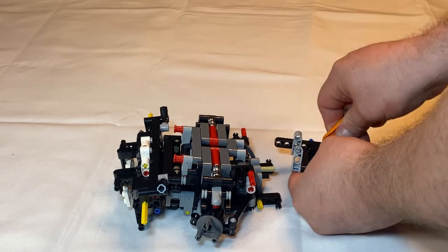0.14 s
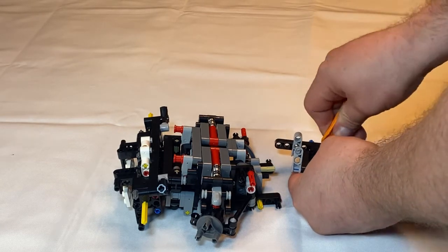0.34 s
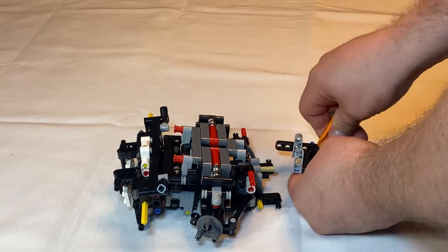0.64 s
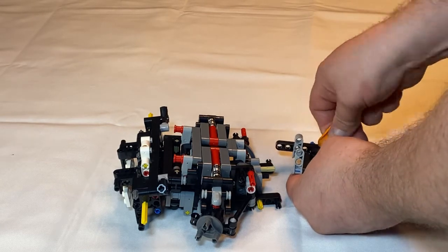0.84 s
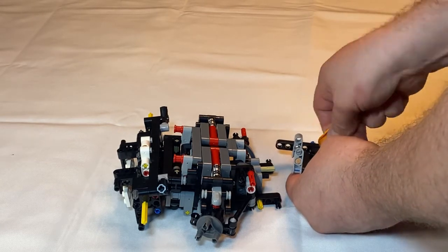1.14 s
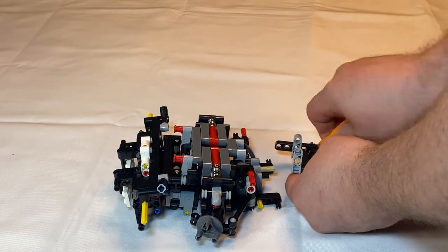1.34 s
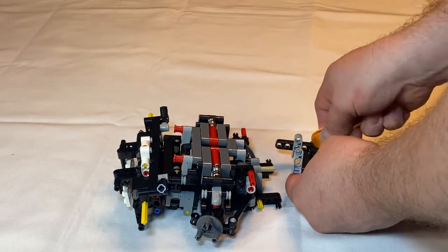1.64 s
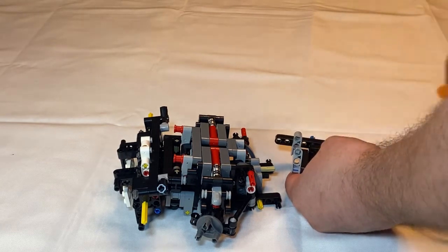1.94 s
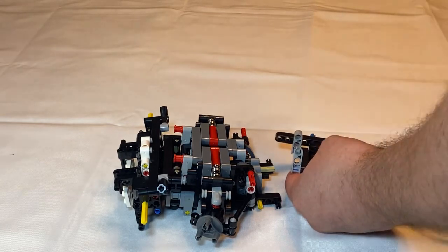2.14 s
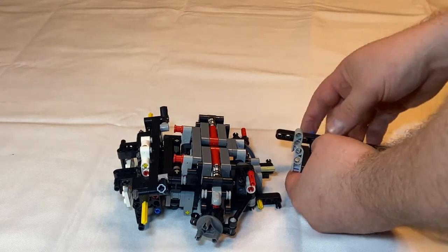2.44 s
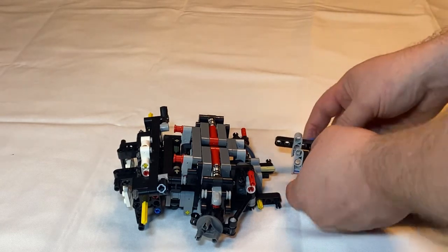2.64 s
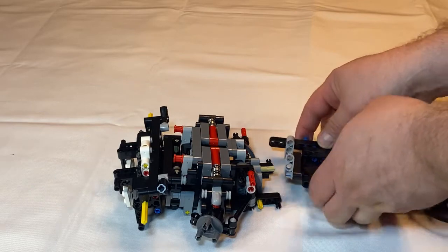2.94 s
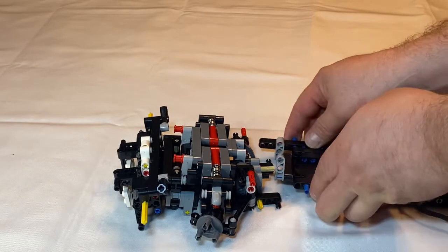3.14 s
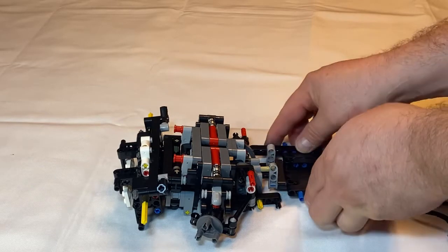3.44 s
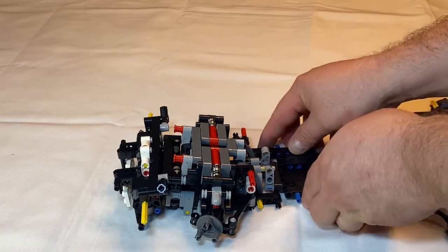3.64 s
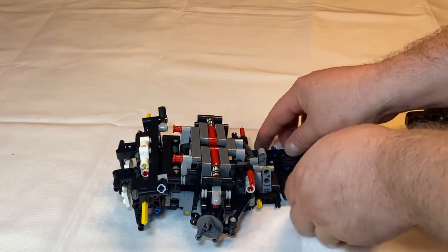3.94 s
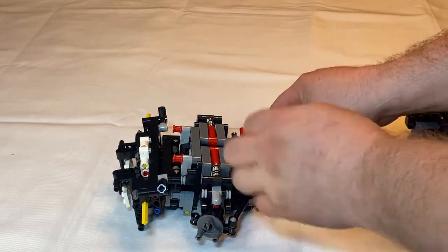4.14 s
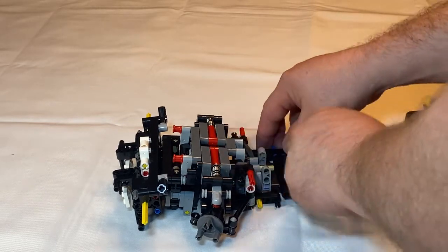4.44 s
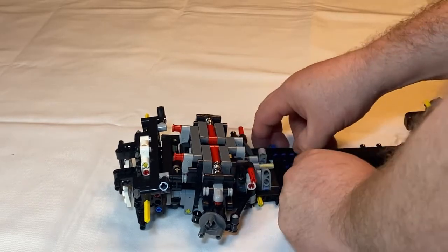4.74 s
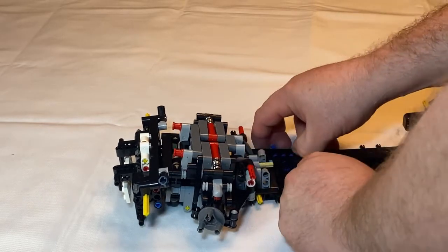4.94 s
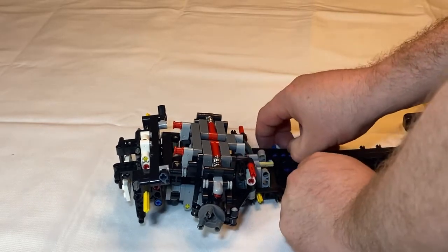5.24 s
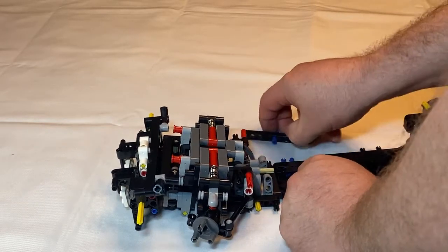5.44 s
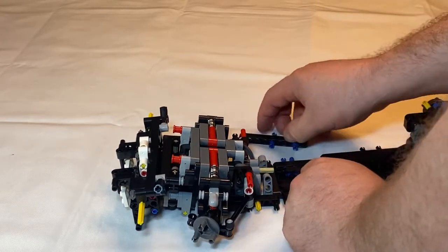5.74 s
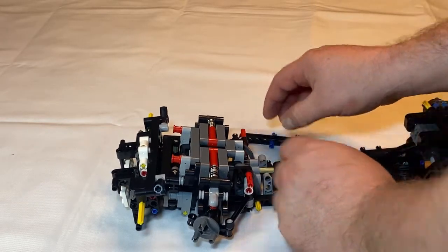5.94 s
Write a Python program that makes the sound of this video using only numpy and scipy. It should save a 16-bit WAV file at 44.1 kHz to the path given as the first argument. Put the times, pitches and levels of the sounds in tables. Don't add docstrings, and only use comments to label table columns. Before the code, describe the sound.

Small hard plastic parts click and scrape softly in a quiet room, a tool knocks on wood, then a joint snaps twice, very loudly.

```python
import sys
import numpy as np
from scipy import signal
from scipy.fft import rfft, irfft, next_fast_len
from scipy.io import wavfile
from scipy.ndimage import uniform_filter1d

SR = 44100
rng = np.random.default_rng(int(sys.argv[2]) if len(sys.argv) > 2 else 0)


def convert_level_to_amplitude(level_db):
    exponent = np.asarray(level_db, float) / 20
    return 10 ** exponent


def master(y):
    cut = np.clip(np.atleast_2d(y).T, -1, 1)
    pcm = np.round(cut * 32767)
    wavfile.write(sys.argv[1], SR, pcm.astype(np.int16))


N = 268569

# f/Hz, width/Hz, level/dB
EDGE = [(5494, 2200, 12.5), (6330, 1200, -0.5), (10790, 1300, -11.5), (13200, 2400, 8)]


def tick(row, noise, body_modes, share, rise_s, ring_s, hard):
    s, db, hz, edge_db, fizz_db, body_db = row
    t = np.arange(len(noise)) / SR
    strike = hard * signal.unit_impulse(len(t), idx=40)
    contact = noise * (1 - np.exp(-(t / rise_s) ** 2)) * np.exp(-t / ring_s) + strike
    cavity = resonate(resonate(contact, [(hz, 800, 0)]), [(hz, 800, 0)])
    ring = cavity + share * resonate(contact, body_modes)
    edge = resonate(resonate(contact, EDGE[:2]), [(6950, 1900, 0)])
    fizz = resonate(resonate(contact, EDGE[2:]), [(12000, 11000, 0)])
    body = resonate(resonate(contact, [(1113, 1300, 0)]), [(1113, 1300, 0)])
    sound = peaked(ring) + convert_level_to_amplitude(edge_db + 6.5) * peaked(edge)
    sound += convert_level_to_amplitude(fizz_db + 15.0) * peaked(fizz)
    sound += convert_level_to_amplitude(body_db + 3.5) * peaked(body)
    return convert_level_to_amplitude(db) * sound


FIZZ_FOLLOWS = 0.68


def ticks(rows, kind, *shape):
    fizz_db, body_db = kind
    out, noise = np.zeros(N), rng.standard_normal((len(rows), 700))
    for row, chatter in zip(rows, noise):
        full_row = (*row, fizz_db + FIZZ_FOLLOWS * row[-1], body_db)
        add(out, row[0] - .0005, tick(full_row, chatter, *shape))
    return out


# fine fizz level/dB, body weight level/dB
KINDS = [
    (-14.5, -41),
    (-10.5, -9),
    (-14, -24.5),
    (-15, -4),
    (-8.5, -22.5),
]
# f/Hz, width/Hz, level/dB
PART = [(1070, 560, -12.5), (1949, 560, -6), (2750, 356, 2), (3550, 700, -6.5), (4600, 400, -12.5)]
# t/s, peak level/dB, ring f/Hz, edge brightness/dB
PRYING = [(0.0145, -38.5, 2930, -9.5), (0.0471, -40.5, 2700, -13), (0.0556, -41, 2480, -5.5),
          (0.0688, -36.5, 3560, -12.5), (0.1965, -38.5, 3600, -13.5), (0.4373, -62, 2890, 3.5),
          (0.4776, -58, 2850, 8), (0.4933, -42.5, 3080, -13), (0.516, -41.5, 3410, -11),
          (0.5347, -51, 3350, -8), (0.549, -47.5, 3520, -23), (0.606, -31.5, 2120, -16),
          (0.6188, -45.5, 1880, -0.5), (0.8695, -61, 2790, -3), (0.8862, -38, 2650, -6),
          (1.0466, -42, 2170, -11), (1.068, -42.5, 2830, -3.5), (1.0854, -38.5, 2880, -14),
          (1.096, -47.5, 2620, -5), (1.1123, -45, 2760, -15), (1.128, -40.5, 2850, -2),
          (1.135, -43.5, 2830, -19), (1.14, -38.5, 3480, -20), (1.158, -39.5, 2880, -13),
          (1.462, -45, 2750, -5.5), (1.4732, -40.5, 2420, -14), (1.4837, -39.5, 3270, -14),
          (1.5008, -41.5, 2850, -12), (1.624, -48, 2440, -7), (1.7638, -60, 2900, -2.5)]
RESTING = [(0.205, -39, 2850, -14), (0.2143, -42.5, 3320, -7), (0.223, -38.5, 2400, -14),
           (0.266, -40, 2550, -13), (0.3162, -52, 1880, -5), (0.61, -37, 2150, -8),
           (0.8412, -48.5, 2620, -9.5), (1.0404, -40, 2350, -22), (1.0537, -52.5, 2180, 0.5),
           (1.1709, -43, 2310, -8.5), (1.6045, -46.5, 3680, -13), (1.6188, -42, 2940, -12.5),
           (1.7376, -55, 2660, -11), (2.6174, -52, 1720, -10), (2.6901, -44.5, 2620, -4.5),
           (2.828, -45.5, 3300, -7), (2.8645, -38.5, 2410, -21), (2.908, -38.5, 2500, -27),
           (2.939, -41, 2850, -9), (3.864, -46.5, 2920, 0.5), (4.279, -53, 3600, -16)]
FITTING = [(0.4647, -68, 2190, 3), (0.57, -66, 3680, 4), (1.033, -30.5, 2020, -22), (2.232, -59, 6000, -12),
           (2.306, -55, 6100, -5), (2.6278, -44.5, 2660, -8), (2.92, -39.5, 3600, -21),
           (3.122, -43.5, 2840, -10), (3.7728, -41, 2900, -8.5), (3.7837, -45, 2890, -12),
           (3.8509, -37.5, 2700, -32), (3.932, -45.5, 2660, -32), (4.5474, -43, 2670, -12),
           (4.55, -44, 2800, -28), (4.587, -35, 2660, -45), (4.5904, -38, 2680, -48),
           (4.6413, -30.5, 3140, -15), (4.816, -28.5, 2920, -12), (4.817, -34.5, 4600, -11),
           (4.858, -59, 4500, -6), (4.907, -50, 3000, -14), (4.831, -44, 4550, -13),
           (5.7972, -45.5, 2730, -30), (5.8578, -51, 3030, -10.5)]
FORCING = [(4.0942, -44, 2600, -17.5), (4.6331, -38.5, 2760, -3.5), (4.8246, -44.5, 2970, -17.5),
           (4.937, -54, 2620, -11), (4.964, -42, 2620, -9.5), (4.9917, -38.5, 2720, -11.5),
           (5.022, -40, 2650, -18), (5.138, -40, 2470, -12), (5.1903, -38, 3100, -12.5),
           (5.216, -43.5, 3190, -11), (5.238, -40, 2816, -12.5), (5.2652, -37, 3156, -7)]


def handling():
    small = zip((PRYING, RESTING, FITTING, FORCING), KINDS)
    return sum(ticks(rows, kind, PART, 0.32, .0005, 0.0014, 1.6) for rows, kind in small)


# t/s, peak level/dB, ring f/Hz, edge brightness/dB
SNAPS = [
    (5.3468, -9.5, 2900, 0),
    (5.3495, -10, 3050, -12),
    (5.3692, -4, 2530, -11),
    (5.3694, -13.5, 2920, -8.5),
    (5.3772, -11.5, 3332, -12),
    (5.3848, -12.5, 2750, -18.5),
    (5.4024, -22.5, 3590, -10.5),
    (5.4295, -20, 3100, -19.5),
]
# f/Hz, width/Hz, level/dB
JOINT = [(870, 240, -7.5), (1550, 290, -3.5), (1980, 540, -6), (2850, 417, 2), (3600, 460, 0),
         (4317, 350, -1.5), (6950, 1100, -12)]


def snapping():
    return ticks(SNAPS, KINDS[-1], JOINT, 1.1, 0.00078, 0.0013, 1.5)


# t/s, level/dB, t60/s
RATTLE = (5.349, -23.5, 0.29)
# f/Hz, width/Hz, level/dB
SCRAPE = [(5130, 2900, 0.5), (7340, 4300, -8.5), (11100, 1800, -7), (12540, 2600, 2)]


def rattle():
    s, db, t60 = RATTLE
    out, u = np.zeros(N), np.arange(SR // 3) / SR
    clumps = convert_level_to_amplitude(2.8 * evened(uniform_filter1d(rng.standard_normal(len(u)), size=150)))
    shower = clumps * rng.standard_normal(len(u)) * (rng.random(len(u)) < .15)
    ring = resonate(shower, JOINT) + .45 * resonate(shower, SCRAPE)
    add(out, s, convert_level_to_amplitude(db - 60 * u / t60) * evened(ring))
    return out


# strongest t/s, rise/s, fall/s, effort level/dB, brightness/dB
DRAGS = [(.56, .16, 0.087, -67, -14), (.622, .01, 0.091, -59, -7.5), (.892, .05, 0.034, -57, -13),
         (1.033, 0.0045, .22, -49, -18), (1.482, 0.049, 0.059, -48, -8), (1.614, 0.018, 0.043, -55.5, -1),
         (1.76, .07, .04, -75, -2), (1.944, 0.051, 0.029, -89, 20.5), (2.48, 0.021, 0.032, -71, 4),
         (2.66, 0.093, 0.35, -57.5, -5.5), (2.915, .22, 0.17, -46, -10.5), (3.125, 0.2, 0.16, -61, -3),
         (3.2, .12, 0.094, -60, -11), (3.425, 0.034, 0.044, -57, -2.5), (3.54, 0.36, 0.15, -68.5, -13),
         (3.84, 0.37, 0.13, -57, -18.5), (4.096, 0.013, 0.11, -55, -19), (4.278, 0.018, 0.047, -59, -10),
         (4.63, 0.13, .07, -58, -13), (4.817, 0.01, 0.087, -50.5, -5.5), (4.996, .07, .1, -66, -2),
         (5.22, 0.13, 0.23, -58, -11.5), (5.797, 0.0069, 0.17, -66.5, -10)]
# loss over one rise or fall/dB, curve power
DRAG_FADE = (-32.5, 1.62)


def strokes():
    clumps = convert_level_to_amplitude(3.9 * evened(uniform_filter1d(rng.standard_normal(N), size=400)))
    sizes = convert_level_to_amplitude(6.7 * np.minimum(rng.exponential(1, N), 2.6))
    slips = rng.random(N) < 1500. / SR
    grains = sizes * slips * rng.choice([-1, 1], N)
    drive = evened(grains * clumps) + 0.72 * rng.standard_normal(N)
    hollow = evened(resonate(drive, PART))
    thin = evened(resonate(resonate(drive, SCRAPE), [(8870, 21000, 0.0076)]))
    effort, bright = swells(DRAGS, DRAG_FADE)
    return convert_level_to_amplitude(-6.0) * (effort * hollow + bright * convert_level_to_amplitude(5.5) * thin)


# t/s, peak level/dB
KNOCKS = [
    (2.1, -63),
    (2.125, -58),
    (2.178, -49),
    (2.216, -46),
    (2.229, -24.5),
    (2.238, -29.5),
    (2.243, -29),
    (2.27, -53),
    (2.31, -33.5),
]
# f/Hz, width/Hz, level/dB
WOOD = [(165, 61, 3.5), (347, 100, 2), (537, 186, 9.5), (705, 73, -7), (840, 62, 3.5), (1560, 450, -2),
        (1840, 250, -1.5), (2600, 290, -6.5), (2890, 270, -7.5)]


def knocks():
    out, u = np.zeros(N), np.arange(SR // 10) / SR
    chatter = rng.standard_normal((len(KNOCKS), len(u)))
    dull = signal.butter(6, 3200, fs=SR, output="sos")
    for (s, db), noise in zip(KNOCKS, chatter):
        ring = signal.sosfilt(dull, resonate(noise * np.exp(-u / 0.0045), WOOD))
        add(out, s, convert_level_to_amplitude(db) * peaked(ring))
    return out


# strongest t/s, rise/s, fall/s, deep sway level/dB, rumble against sway/dB
LEANS = [(0.01, 0.088, 0.32, -57.5, 2.5), (.23, 0.29, 0.26, -50, -2), (.63, 0.063, 0.061, -47, -2),
         (.69, 0.14, 0.24, -45.5, -16), (.86, 0.056, 0.19, -51.5, -1.5), (1.16, 0.32, 0.21, -57.5, 1.5),
         (1.64, 0.15, 0.14, -52, 0), (1.91, 0.087, 0.19, -64, -20), (2.134, .1, 0.21, -53, -2),
         (2.234, 0.052, 0.27, -56, 16), (2.4, 0.26, 0.11, -51.5, -4), (2.68, 0.11, 0.73, -75, 10.5),
         (2.89, 0.065, 0.12, -49.5, 0.5), (2.96, .1, 0.38, -48, -22), (3.93, 0.65, .3, -55, -11),
         (4.2, 0.62, 0.56, -66, 2), (4.66, 0.13, 0.11, -54, 6), (4.83, 0.035, 0.11, -52.5, 6),
         (4.88, 0.09, .12, -45.5, -8), (4.98, 0.075, 0.28, -54.5, 1.5), (5.22, 0.2, 0.42, -50, -1.5),
         (5.375, .025, 0.21, -35.5, 7.5), (5.45, .1, .4, -43, -19), (6.07, 0.58, 0.21, -65, 3)]
# loss over one rise or fall/dB, curve power
LEAN_FADE = (-30.5, 1.166)
# f/Hz, width/Hz, level/dB
DEEP = [(46.3, 31, -4), (77.5, 30, 1.5)]
# f/Hz, width/Hz, level/dB
PANEL = [(165, 60, -1.5), (250, 145, -1), (343, 125, 0), (630, 600, -13.5)]
# t/s, peak level/dB, f/Hz, t60/s
THUDS = [(.612, -37.5, 165, 0.34), (0.843, -45, 88, 0.16), (1.167, -46.5, 124.4, 0.18),
         (1.614, -42, 100, 0.16), (2.874, -44, 165, 0.31), (2.944, -40.5, 77.3, 0.35),
         (4.637, -47.5, 91.4, 0.44), (4.823, -42.5, 128, 0.16), (5.348, -16, 296, 0.075),
         (5.369, -30, 204.6, 0.33), (5.371, -28.5, 97.1, 0.38), (5.35, -28.5, 148, 0.49)]


def table():
    sway, rumble = swells(LEANS, LEAN_FADE)
    deep = evened(resonate(resonate(rng.standard_normal(N), DEEP), [(69.86, 220, 0)]))
    panel = evened(resonate(resonate(rng.standard_normal(N), PANEL), [(264.0, 630, 0)]))
    out = convert_level_to_amplitude(-1.5) * sway * deep + convert_level_to_amplitude(-2.5) * rumble * panel
    u = np.arange(SR // 2) / SR
    soft_start = 1 - np.exp(-u / 0.0026)
    for start, db, hz, t60 in THUDS:
        overtone = .45 * np.sin(2 * np.pi * 1.62 * hz * u) * np.exp(-u / 0.015)
        ring = np.sin(2 * np.pi * hz * u) + overtone
        add(out, start, convert_level_to_amplitude(db - 60 * u / t60) * soft_start * ring)
    return out


# f/Hz, t60/s
ROOM = [(100, 0.42), (500, 0.3), (2000, 0.39), (6000, 0.34), (12000, 0.21)]


def room(x, gap_s, length):
    taps = np.zeros(SR // 2)
    at = np.arange(100, SR // 2 - 12, 12)
    taps[at + rng.integers(0, 12, len(at))] = rng.choice([-1., 1.], len(at))
    hz, t, z = signal.stft(taps, SR, nperseg=256)
    t60 = length * read(ROOM, hz)[:, None]
    tail = signal.istft(z * convert_level_to_amplitude(-60 * t / t60), SR, nperseg=256)[1]
    tail *= 1 - np.exp(-(np.arange(len(tail)) / SR / gap_s) ** 2)
    return signal.fftconvolve(x, tail / np.linalg.norm(tail))[:N]


# f/Hz, density level/dB
ROOM_TONE = [(18, -27), (32, 0.5), (77, 2), (240, -9), (1300, -23.5), (2200, -25), (2630, -23), (3800, -28),
             (7000, -32.5), (12500, -30.5), (16000, -45.5)]
ROOM_TONE_DB = -64.5


def room_tone():
    return convert_level_to_amplitude(ROOM_TONE_DB) * evened(coloured(rng.standard_normal(N), ROOM_TONE))


def swells(rows, fade):
    top, rise, fall, db, second_db = np.transpose(rows)[:, :, None]
    t = np.arange(0, N + 64, 64) / SR
    before = (top - t) / np.maximum(rise, .002)
    after = (t - top) / np.maximum(fall, .002)
    away = np.where(t < top, before, after)
    gain = convert_level_to_amplitude(db + fade[0] * away ** fade[1])
    layers = (gain, gain * convert_level_to_amplitude(second_db))
    return [np.interp(np.arange(N) / SR, t, np.linalg.norm(g, axis=0)) for g in layers]


def resonate(x, modes):
    out = 0
    for k, (hz, width, db) in enumerate(modes):
        out = out + (-1) ** k * convert_level_to_amplitude(db) * signal.lfilter(*signal.iirpeak(hz, hz / width, SR), x)
    return out


def coloured(x, points):
    size = next_fast_len(N)
    gain = convert_level_to_amplitude(read(points, np.fft.rfftfreq(size, 1 / SR)))
    return irfft(rfft(x, size) * gain, size)[:N]


def read(points, hz):
    f, value = np.transpose(points)
    return np.interp(np.log(hz + 1), np.log(f + 1), value)


def evened(x):
    return x / np.sqrt(np.mean(x ** 2) + 1e-20)


def peaked(x):
    return x / np.abs(x).max()


def add(mix, s, sound):
    part = mix[round(s * SR):][:len(sound)]
    part += sound[:len(part)]


def scene():
    near = handling() + strokes()
    snap = snapping() + rattle()
    tool = knocks()
    wet = convert_level_to_amplitude(-7.5) * room(near, 0.0025, .7)
    wet += convert_level_to_amplitude(-9.0) * room(snap, 0.0057, 0.96)
    wet += convert_level_to_amplitude(-6.0) * room(tool, 0.0098, 0.82)
    left_right_db = np.array([[-3.5], [2.5]])
    return (near + snap + tool + wet + table() + room_tone()) * convert_level_to_amplitude(left_right_db)


def thinned_top(x, from_hz, keep_db, rise_db):
    hz, t, z = signal.stft(x, SR, nperseg=1024)
    power = uniform_filter1d(np.mean(abs(z) ** 2, axis=0), size=16, axis=0)
    bar_db = keep_db + rise_db * (hz[:, None] - from_hz) / 1000
    over_db = 10 * np.log10(abs(power) + 1e-20) - bar_db
    keep = (hz[:, None] < from_hz) | (uniform_filter1d(over_db, size=2, axis=1) > 0)
    return signal.istft(z * keep, SR, nperseg=1024)[1][:, :N]


def band_limit(x):
    return signal.sosfilt(signal.butter(12, 15690, fs=SR, output="sos"), x)


# f/Hz, level/dB
MIC = [(20, -0.5), (6900, -0.5), (7600, -5), (8500, -9), (9100, -21.5), (9550, -11.5), (10000, -5.5),
       (14300, -8.5), (15900, -17.5)]


def record(dry):
    heard = np.array([coloured(channel, MIC) for channel in dry])
    heard = thinned_top(heard, from_hz=12800, keep_db=-112, rise_db=2.2)
    return band_limit(np.clip(heard, -1, 1))


dry = scene()
out = record(dry)
master(out)
```